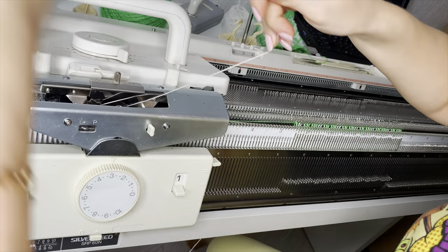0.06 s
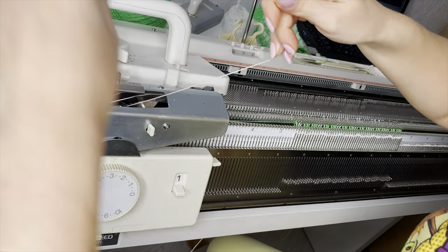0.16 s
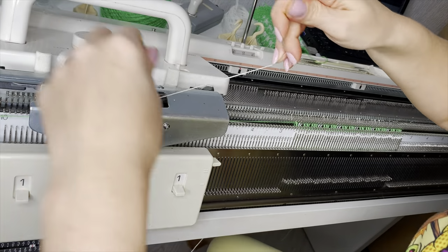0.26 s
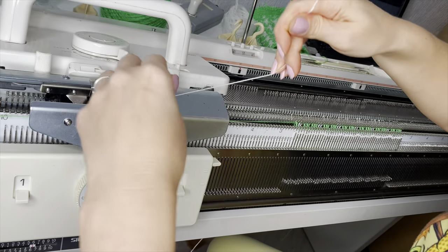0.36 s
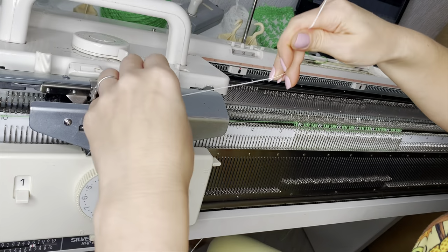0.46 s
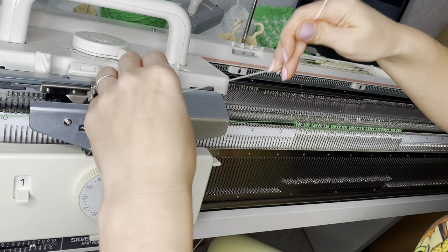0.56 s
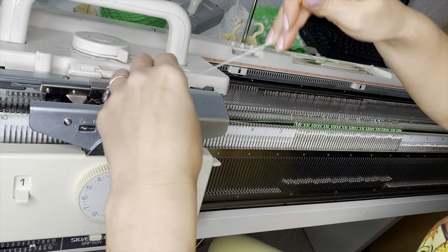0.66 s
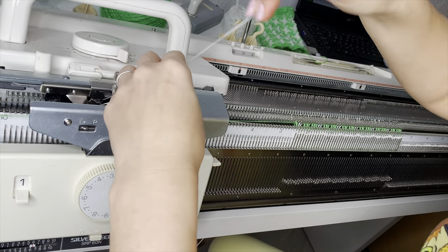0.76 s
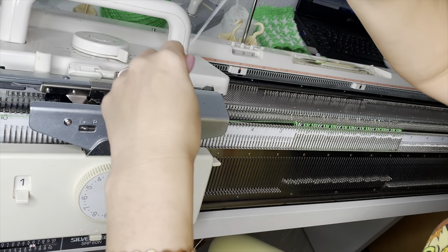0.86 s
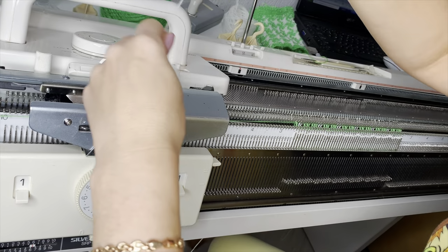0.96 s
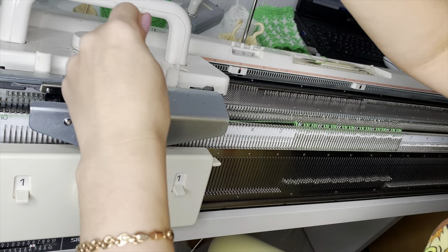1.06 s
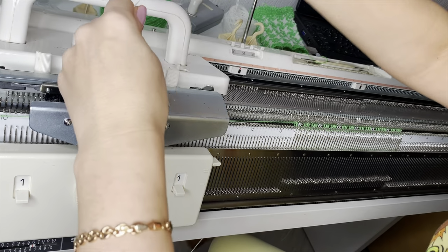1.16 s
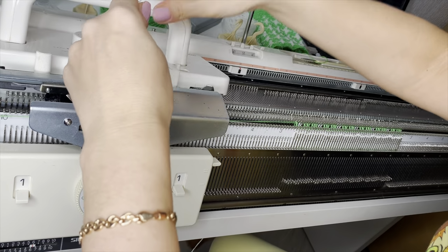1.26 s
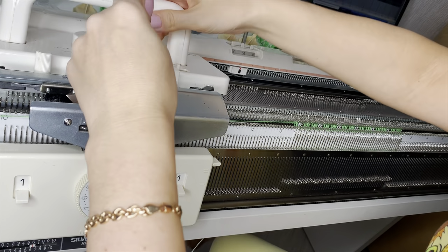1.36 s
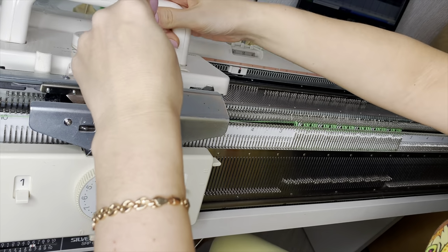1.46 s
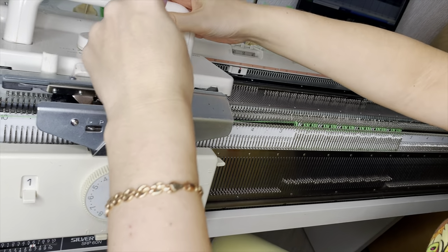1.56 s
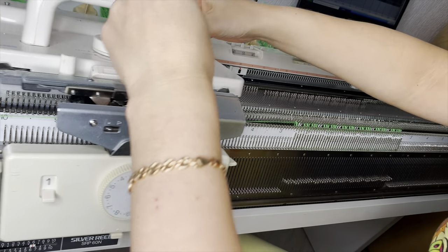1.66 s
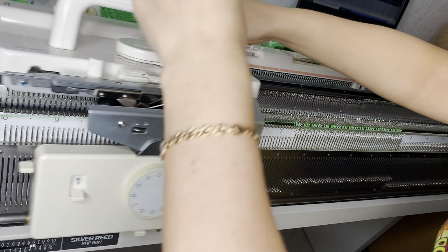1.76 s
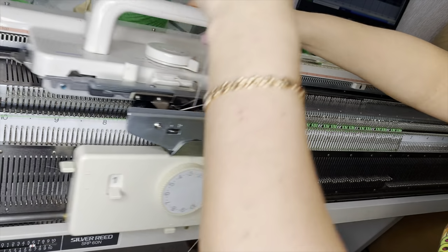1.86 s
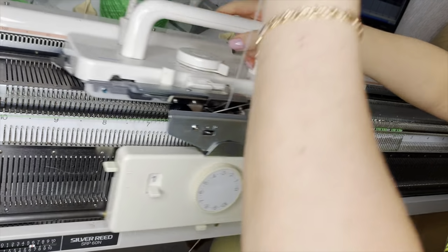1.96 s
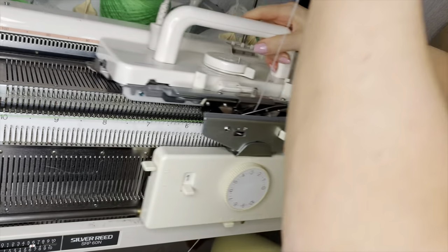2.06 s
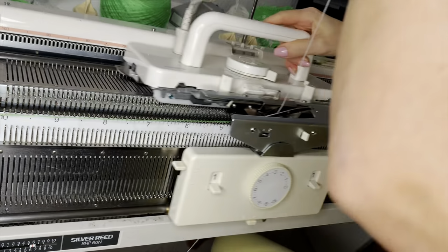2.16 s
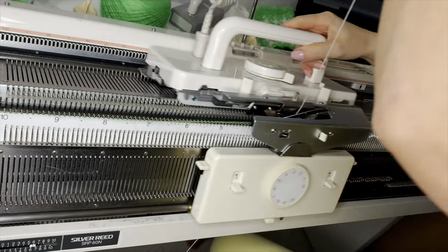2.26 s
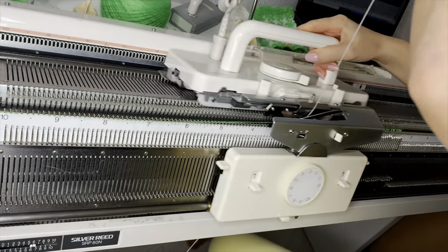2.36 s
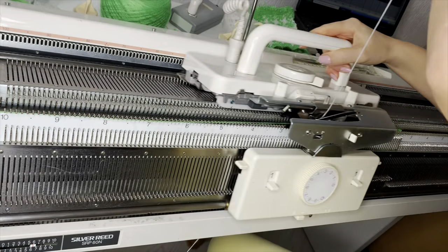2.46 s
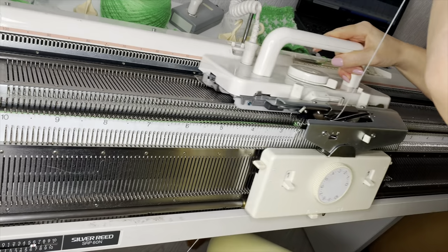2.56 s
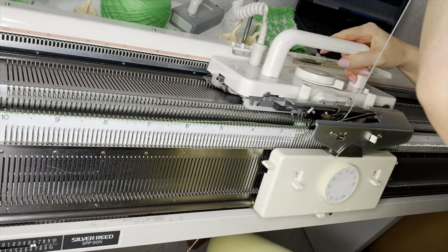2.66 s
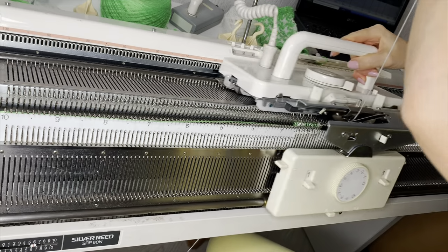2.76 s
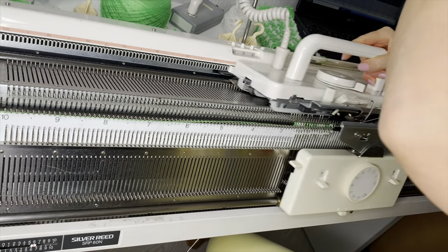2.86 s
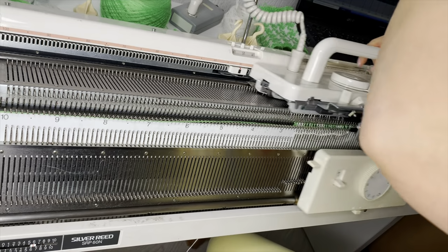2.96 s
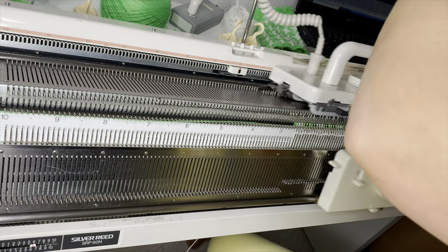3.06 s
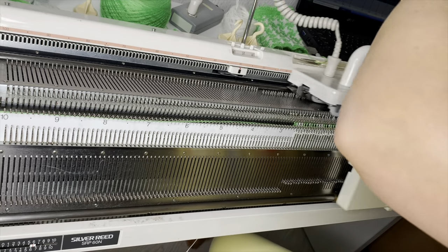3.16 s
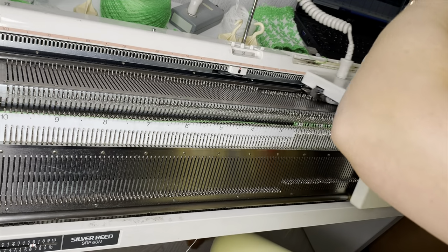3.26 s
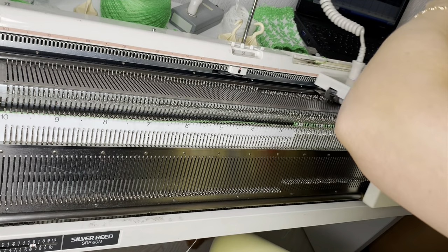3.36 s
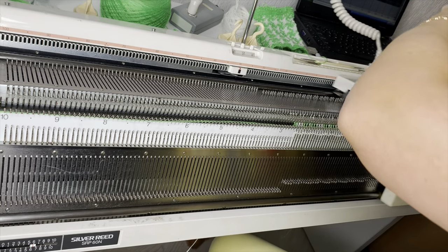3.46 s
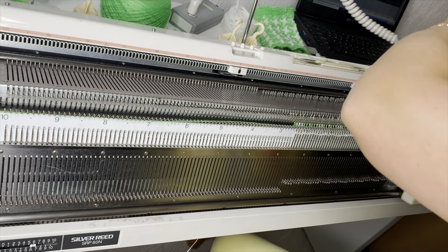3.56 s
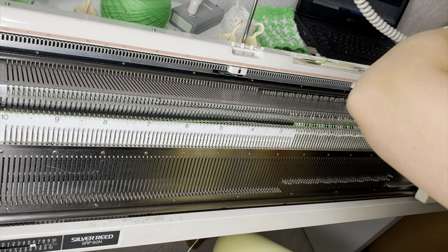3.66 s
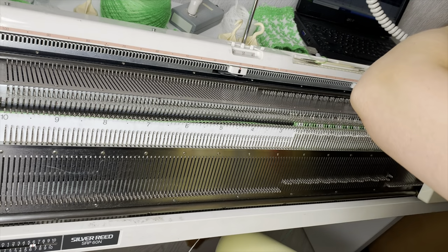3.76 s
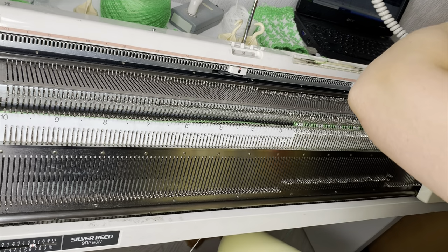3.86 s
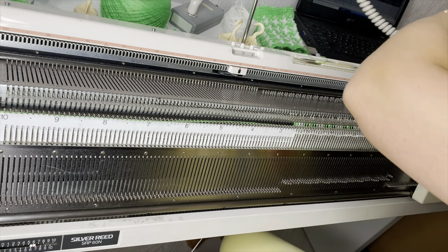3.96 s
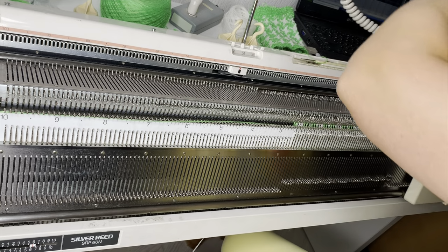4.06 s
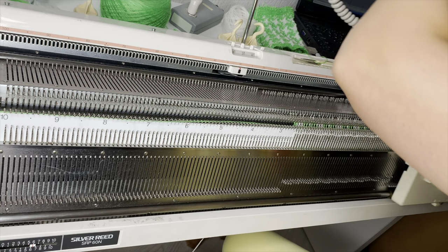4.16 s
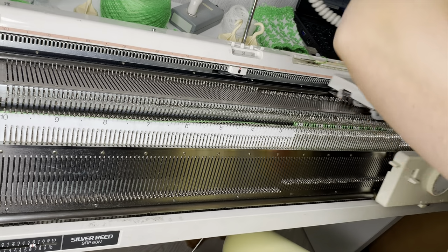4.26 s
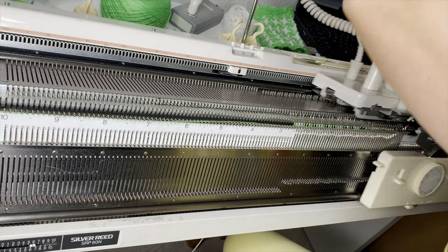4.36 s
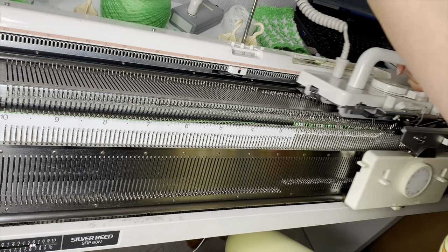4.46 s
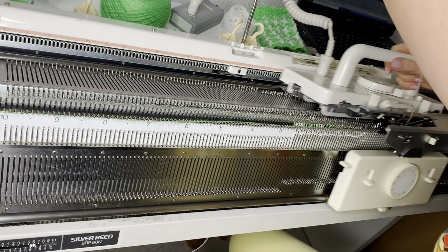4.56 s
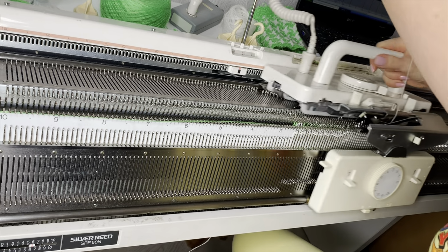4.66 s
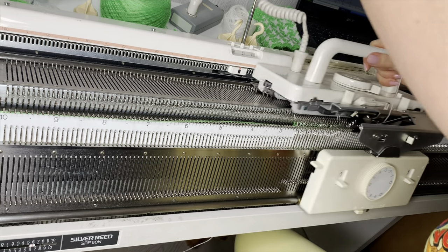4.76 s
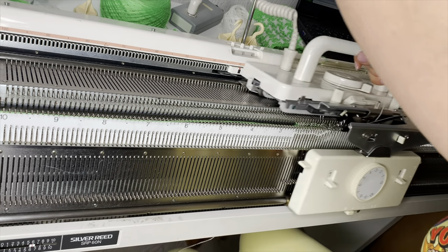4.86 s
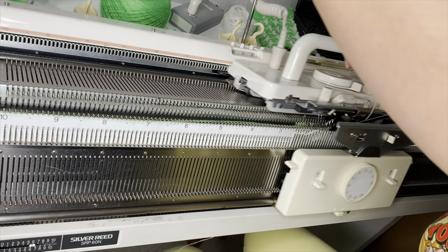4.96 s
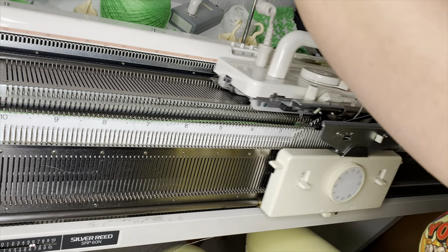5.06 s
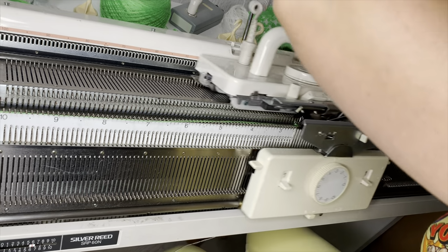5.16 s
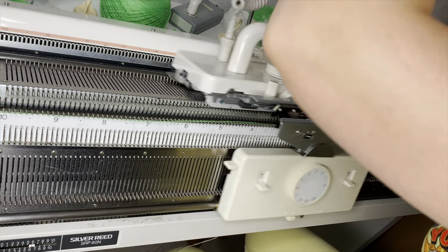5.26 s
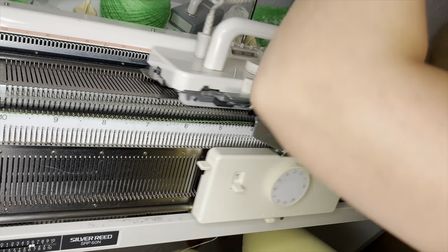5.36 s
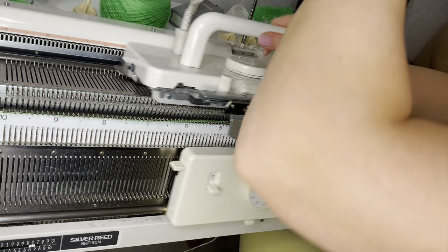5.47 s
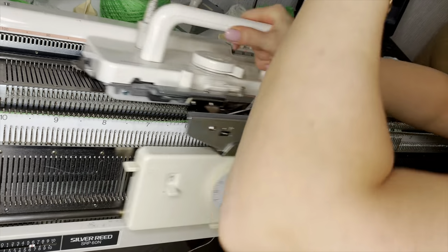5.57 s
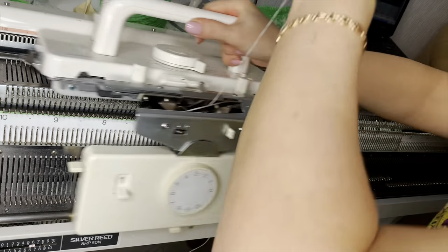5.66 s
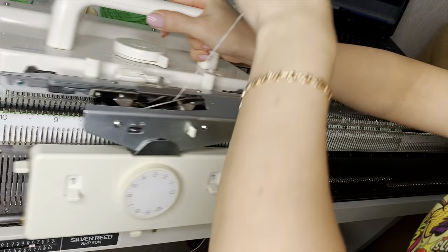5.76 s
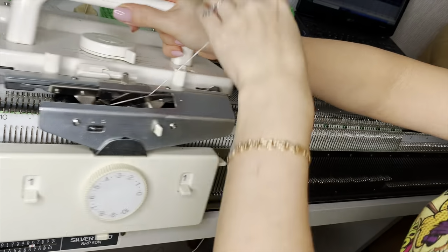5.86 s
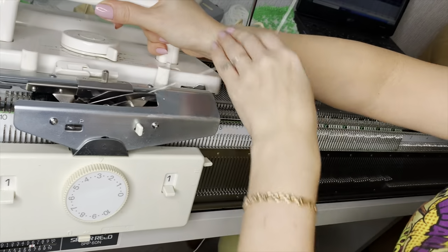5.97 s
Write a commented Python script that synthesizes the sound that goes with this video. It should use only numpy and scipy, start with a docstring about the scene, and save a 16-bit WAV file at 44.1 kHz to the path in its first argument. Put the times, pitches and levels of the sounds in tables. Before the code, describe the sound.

After faint hand taps, a knitting machine carriage rattles loudly across metal needles, snaps, pauses briefly, then clatters back and ends with a snap.

```python
"""A hand brushes, taps and bumps a knitting machine, then pushes its carriage along the needle beds and back.
Needles rattle through the cams and steel slides on steel: noise shaped by each needle's touches.
The table rumbles with the speed; sprung cam flaps click as noise bursts with ringing partials,
the carriage judders in swelling runs of slips, and the cams snap into and out of the row of needles.
A small room, heard from close by through two microphone ports."""
import sys
import numpy as np
from scipy import signal
from scipy.fft import rfft, irfft, next_fast_len
from scipy.io import wavfile
from scipy.ndimage import uniform_filter1d

SR = 44100
rng = np.random.default_rng(int(sys.argv[2]) if len(sys.argv) > 2 else 0)


def generate_wav(sig):
    """Save sig (samples, or channels by samples) to the path in sys.argv[1] as 16-bit PCM at SR."""
    pcm = np.round(np.clip(np.atleast_2d(sig).T, -1, 1) * 32767).astype(np.int16)
    wavfile.write(sys.argv[1], SR, pcm)


N = 264715
T = np.arange(N) / SR   # time in seconds

# The carriage's speed, out and back. Each row: time in seconds, needles passed per second.
CARRIAGE_SPEED = [(1.5, 24), (1.78, 21.2), (2.08, 48.6), (2.72, 47.4), (2.94, 57.8), (3.14, 65.5),
                  (3.33, 51.4), (3.68, 36.3), (3.8, 23.2), (3.92, 20.3), (4.1, 26.5), (4.18, 44),
                  (4.65, 52.5), (4.78, 44.8), (5.12, 51.5), (5.33, 61), (5.64, 42.8), (6.0, 31.6)]
PUSH_S = CARRIAGE_SPEED[0][0]   # the push begins
# Cam flaps and levers clicking. Each row: start in seconds, crack level in dB, casing knock and
# spring ring in dB relative to the crack, chatter in seconds, pitch the knock favours in Hz, flap pitch in Hz.
FLAP_CLICKS = [(0.036, -78.5, -6, 28.5, 0.044, 3500, 7900), (0.434, -61, 2.5, 6, 0.0058, 4530, 7740),
               (0.703, -70, -1, 2, .003, 4450, 7900), (1.3227, -27.5, -20, -16.5, 0.00048, 3690, 8720),
               (1.4917, -62, 0, -16, .0043, 1610, 8600), (1.563, -45, -7, -12, .009, 5500, 8400),
               (1.607, -42, 7, -22, 0.0029, 3870, 7640), (1.608, -51, 12.5, -20, 0.0036, 1440, 8700),
               (1.907, -40, -2, -22, 0.0031, 2270, 8900), (2.046, -29, -13, -15, .005, 2290, 8700),
               (2.0927, -12.5, -16, -1.5, 0.0032, 3220, 7800), (2.157, -19, -11, -20, 0.0062, 3300, 8800),
               (2.2, -14.5, -8.5, -8.5, 0.004, 2310, 9400), (2.279, -26, -2.5, -15, 0.0045, 3270, 8900),
               (2.3132, -34, -5, -15, .003, 2250, 8800), (2.3306, -13.5, -7, -8, 0.0022, 2300, 8800),
               (2.4282, -13.5, -11, -10, 0.0043, 1560, 9000), (2.47, -14, -6, -10, .0025, 4140, 9400),
               (2.552, -24, -5.5, -19, 0.0079, 2180, 8700), (2.638, -11.5, -10, -7, 0.0039, 2350, 8840),
               (2.7439, -25, -9, -20, 0.0031, 2350, 8800), (2.761, -18, -8.5, -25, .006, 3620, 8870),
               (2.8233, -12, -11, -18, .002, 2290, 7500), (2.8951, -18.5, -12, -17, 0.013, 2340, 8820),
               (2.949, -13, -12.5, -7, .003, 2400, 8000), (3.051, -26, -14, -18, .002, 3250, 8900),
               (3.218, -32, -19, -18, .004, 2300, 8800), (3.348, -24.5, -8, -21, 0.0044, 2440, 8800),
               (3.4214, -31, -4, -20, .002, 2400, 8800), (3.4428, -24.5, -6, -18, .003, 2350, 8800),
               (3.465, -15.5, -11.5, -19, .004, 2350, 8760), (3.512, -29, -13, -20, 0.013, 2360, 8700),
               (4.118, -39, -15, -19, .005, 2300, 8800), (4.3404, -30, -19, -18, .002, 3400, 9000),
               (4.3734, -10.5, -14.5, -16, 0.0031, 3400, 9160), (4.477, -8.5, -19, -14, 0.0036, 2312, 9200),
               (4.5778, -11, -18, -10, .0027, 4368, 9730), (4.6695, -11.5, -23, -25, .0051, 2340, 9150),
               (4.8041, -23, -13, -18, .002, 2400, 8976), (4.8461, -20, -23, -20, .0008, 3400, 9040),
               (4.8645, -7.5, -19.5, -31, 0.0037, 3690, 8300), (4.958, -18, -19, -18, .003, 2480, 8950),
               (4.973, -15.5, -14, -21, 0.0018, 2490, 8970), (5.0157, -12, -16.5, -15, 0.0028, 3711, 8176),
               (5.075, -28, -15, -18, .002, 2400, 9100), (5.5324, -20.5, -9.5, -19, .003, 2319, 8810),
               (5.5622, -12, -10.5, -10.5, 0.0022, 1743, 8750)]
CLICK_RISE_S = .001
# spread of the grip of rubbing skin and yarn in dB, 0 for smooth; steps per second
GRIP_STEPS_PER_S, GRIP_SPREAD_DB = 100, 0


def from_db(db):
    """Decibels to gain."""
    return 10 ** (np.asarray(db) / 20)


def rms_one(x):
    """Scale to unit power."""
    return x / np.sqrt(np.mean(x ** 2) + 1e-20)


def even_out(x, window):
    """Divide out the slow swells of the level, keeping the quick detail."""
    return x / np.sqrt(uniform_filter1d(x[0] ** 2, window) + 1e-6)


def at_hz(points, hz):
    """Read a table along log frequency."""
    f, value = np.transpose(points)
    return np.interp(np.log(np.maximum(hz, 1)), np.log(f), value)


def noise():
    """Two unrelated white noises: what the ports share, and what differs between them."""
    return rng.standard_normal((2, N))


def colour(x, spectrum, size=4096):
    """Causal (minimum-phase) filter with the given spectrum; white noise keeps its power."""
    log_gain = np.log(from_db(at_hz(spectrum, np.fft.rfftfreq(size, 1 / SR))))
    # folding the cepstrum onto positive times makes the filter minimum-phase
    cepstrum = irfft(log_gain)
    cepstrum[1:size // 2] *= 2
    cepstrum[size // 2 + 1:] = 0
    response = irfft(np.exp(rfft(cepstrum)))
    return signal.oaconvolve(x, response[None] / np.linalg.norm(response), axes=1)[:, :N]


def resonate(x, modes):
    """Parallel resonances of alternating sign; white noise keeps its power."""
    out, power = 0, 0
    for k, (hz, width, db) in enumerate(modes):
        r = np.exp(-np.pi * width / SR)
        zeros = np.array([1, 0, -1]) * (1 - r * r) / 2
        poles = [1, -2 * r * np.cos(2 * np.pi * hz / SR), r * r]
        out = out + (-1) ** k * from_db(db) * signal.lfilter(zeros, poles, x + 1e-18)
        power += from_db(db) ** 2 * (1 - r)
    return out / np.sqrt(power)


def blow(rise_s, hold_s, t60):
    """Envelope of one contact: it builds, chatters for a moment and dies."""
    t = T[:SR // 2]
    return np.minimum(t / rise_s, 1) * from_db(-60 * np.maximum(t - hold_s, 0) / t60)


def ring(hz, rise_s, t60):
    """One dying tone, a quarter cycle apart in the two rows so that both ports hear it."""
    t = T[:SR // 5]
    phase = rng.random() + np.array([[0], [rng.choice([-1, 1]) / 4]])
    return blow(rise_s, rise_s, t60)[:len(t)] * np.sin(2 * np.pi * (hz * t + phase))


def add(out, s, sound):
    """Mix a sound in at time s."""
    start = max(round(s * SR), 0)
    out[..., start:start + sound.shape[-1]] += sound[..., :N - start]


def hump(s, width_s):
    """A smooth rise and fall around time s, height 1."""
    return np.exp(-np.minimum(((T - s) / width_s) ** 2, 20))


def uneven(per_s, spread_db):
    """Randomly wandering gain of a contact; unit power, and constant when the spread is 0 dB."""
    grip = np.clip(rng.standard_normal(4096), -2, 2)
    return rms_one(from_db(spread_db * np.interp(T * per_s, np.arange(4096), grip)))


def air():
    """Steady background of the quiet room: noise with a coloured spectrum."""
    # Background spectrum. Each row: frequency in Hz, relative level in dB per Hz.
    air_spectrum = [(15, -52), (25, 17.5), (59, -6.5), (384, -14.5), (911, -23.5), (1610, -22), (6380, -47),
                    (7110, -39.5), (9320, -36.5), (10700, -37), (11600, -42.5), (14000, -39), (16000, -85)]
    return from_db(-62) * colour(noise(), air_spectrum)


def skin():
    """Skin resting on and stroking the casing: smooth noise, a dull rub and a bright swish."""
    # The hand brushes the casing. Each row: start in seconds, length in seconds,
    # dull rub in dB, bright swish in dB.
    brushes = [(0.006, 0.024, -50, -72), (0.065, 0.031, -58.5, -70), (0.12, .02, -55.5, -71),
               (0.158, 0.036, -59, -78), (0.241, 0.01, -60, -84), (0.303, 0.19, -78, -87),
               (0.671, .01, -65, -92), (0.774, 0.017, -57.5, -64.5), (0.969, 0.011, -65, -88),
               (1.506, 0.019, -53, -81)]
    # Dull rub spectrum. Each row: frequency in Hz, relative level in dB per Hz.
    rub_spectrum = [(60, 11.5), (150, 1.5), (330, -2), (550, -2), (900, -15), (2000, -25), (5000, -37)]
    # Bright swish spectrum. Each row: frequency in Hz, relative level in dB per Hz.
    swish_spectrum = [(600, -25), (1500, 4), (3000, 5), (5000, 2.5), (8000, 6.5), (12000, -38),
                      (16000, -16)]
    # the hand rests on the handle until the push begins
    rub, swish = from_db(-72.5) * (T < PUSH_S), np.zeros(N)
    for s, length_s, rub_db, swish_db in brushes:
        stroke = blow(rise_s=0.0025, hold_s=length_s, t60=0.19)
        add(rub, s, from_db(rub_db) * stroke)
        add(swish, s, from_db(swish_db) * stroke)
    out = from_db(2.0) * rub * colour(noise(), rub_spectrum) + swish * colour(noise(), swish_spectrum)
    return out * uneven(GRIP_STEPS_PER_S, GRIP_SPREAD_DB)


def bumps():
    """Soft thuds that glide down in pitch and rattle as they die: bending waves arrive highest first."""
    # Soft bumps on the machine. Each row: start in seconds, level in dB, first pitch in Hz,
    # pitch it settles towards in Hz.
    bump_rows = [(0.008, -54, 480, 262), (0.08, -50, 119, 68.6), (0.124, -49.5, 382, 298),
                 (0.168, -48, 364, 296), (0.77, -54, 367, 149), (1.493, -55, 700, 201),
                 (1.522, -43.5, 168, 73), (1.86, -53, 428, 380), (1.996, -43, 422, 338.1),
                 (2.36, -33.5, 230, 91.6), (2.962, -29.5, 103.1, 79), (3.206, -27, 111, 85.57),
                 (3.35, -32.5, 107, 82.5), (3.967, -44.5, 300, 99), (4.044, -50.5, 479.7, 400.2),
                 (4.676, -40, 149, 79), (5.86, -52, 379, 327)]
    thuds = np.zeros(N)
    for s, db, first_hz, last_hz in bump_rows:
        hz = last_hz + (first_hz - last_hz) * np.exp(-T[:SR // 2] / 0.0149)
        tone = np.sin(2 * np.pi * np.cumsum(hz) / SR)
        add(thuds, s, from_db(db) * blow(0.0019, 0.016, 0.15) * tone)
    return thuds * uneven(per_s=220, spread_db=4)


def hands():
    """Skin rubs and swishes in both noises; the bumps go only into the sound the ports share."""
    out = skin()
    out[0] += bumps()
    return out


def yarn():
    """Yarn scrapes steadily through its wire guide: noise through the guide's resonances."""
    # Pulls of the yarn. Each row: start in seconds, swell in seconds, level in dB.
    yarn_pulls = [(0.003, 0.0027, -67), (0.13, .015, -73), (0.18, .035, -64.5)]
    # Resonances of the guide. Each row: frequency in Hz, width in Hz, level in dB.
    guide_modes = [(3400, 740, -1), (2700, 430, 0)]
    pull = np.zeros(N)
    for s, swell_s, db in yarn_pulls:
        add(pull, s, from_db(db) * blow(swell_s, swell_s, 0.15))
    return resonate(pull * uneven(GRIP_STEPS_PER_S, GRIP_SPREAD_DB) * noise(), guide_modes)


def knock(chatter_s, favoured_hz):
    """The casing is knocked; the spot struck decides which resonances rattle most and which tone rings on."""
    # Resonances of the casing. Each row: frequency in Hz, width in Hz,
    # level in dB before the favouring below.
    casing_modes = [(1520, 63, 6.5), (1766, 41, 8), (2320, 320, 4.5), (2800, 102, 6.5), (3270, 490, 1),
                    (3620, 70, 9.5), (4070, 910, 5.5), (4390, 170, 4.5)]
    db_per_octave = 6   # lost for each octave away from the favoured pitch
    favoured_modes = []
    for hz, width, db in casing_modes:
        octaves_away = abs(np.log2(hz / favoured_hz))
        favoured_modes.append((hz, width, db - db_per_octave * octaves_away))
    envelope = blow(CLICK_RISE_S, chatter_s, 0.024)[:SR // 5]
    rattle = resonate(envelope * rng.standard_normal((2, SR // 5)), favoured_modes)
    return from_db(-2) * rattle + from_db(-3) * ring(favoured_hz, CLICK_RISE_S, 0.036)


def clicks():
    """A sprung flap chatters for milliseconds, knocks the casing and rings with its spring; nails tap too."""
    # Fingernails tap the casing. Each row: start in seconds, level in dB, pitch the knock favours in Hz.
    nail_taps = [(0.128, -63, 1600), (0.155, -66, 3600), (0.39, -68, 4500), (0.435, -57, 1560),
                 (0.704, -70, 1550), (0.961, -66, 1520), (1.465, -57, 3600), (1.466, -60, 1800)]
    # Close partials of a flap. Each row: ratio to its pitch, level in dB relative to the crack.
    flap_modes = [(.955, -19), (1, -11.5), (1.05, -12.5)]
    # The flap spring. Each row: frequency in Hz, level in dB, t60 in seconds.
    spring_modes = [(1524, -19, 0.039), (4490, -21, .1), (7840, -1, 0.051)]
    # Crack spectrum. Each row: frequency in Hz, relative level in dB per Hz.
    crack_spectrum = [(500, -18.5), (2000, -10.5), (5500, -9.5), (8000, 4.5), (10000, 1.5), (12500, 0),
                      (15500, -19)]
    force, out = np.zeros(N), np.zeros((2, N))
    for s, db, knock_db, spring_db, chatter_s, favoured_hz, flap_hz in FLAP_CLICKS:
        add(force, s, from_db(db) * blow(CLICK_RISE_S, chatter_s, 0.017))
        add(out, s, from_db(db + knock_db) * knock(chatter_s, favoured_hz))
        for ratio, mode_db in flap_modes:
            add(out, s, from_db(db + mode_db) * ring(ratio * flap_hz, CLICK_RISE_S, t60=0.019))
        for hz, mode_db, t60 in spring_modes:
            add(out, s, from_db(db + spring_db + mode_db) * ring(hz, chatter_s / 2, t60))
    for s, db, favoured_hz in nail_taps:
        add(out, s, from_db(db) * knock(0.0024, favoured_hz))
    return out + from_db(-11.5) * colour(force * noise(), crack_spectrum)


def judders():
    """The carriage drags on its rail in a swelling run of slips: its plates rattle, then its shell booms."""
    # The carriage jerks into motion or judders. Each row: start in seconds, rattle in dB, boom in dB,
    # swell in seconds, hold in seconds.
    judder_rows = [(1.483, -51, -45.5, 0.0074, .007), (2.413, -24, -23.5, 0.012, 0.022),
                   (5.396, -26, -23.5, 0.01, 0.025)]
    # Rattling steel plates. Each row: frequency in Hz, width in Hz, level in dB.
    plate_modes = [(1050, 130, -2), (1497, 110, 3), (1615, 160, 2.5), (2420, 500, -3), (3340, 530, -4),
                   (4400, 720, -6.5), (8300, 4500, -10.5)]
    # The booming shell. Each row: frequency in Hz, width in Hz, level in dB.
    shell_modes = [(325, 24, 8.5), (390, 22, 2.5), (510, 180, -0.5), (662, 147, 1.5), (777, 170, -0.5)]
    boom_lag_s = 0.0056   # the boom builds later than the rattle
    rattle, boom = np.zeros(N), np.zeros(N)
    for s, rattle_db, boom_db, swell_s, hold_s in judder_rows:
        add(rattle, s, from_db(rattle_db) * blow(swell_s, hold_s, 0.068))
        add(boom, s + boom_lag_s, from_db(boom_db) * blow(swell_s, hold_s, 0.15))
    slips = noise() * uneven(per_s=450, spread_db=4.5)
    plates = from_db(1.5) * resonate(rattle * slips, plate_modes)
    shell = from_db(1.0) * resonate(boom * slips, shell_modes)
    return plates + shell


def speed():
    """Needles passed per second."""
    return np.maximum(np.interp(T, *np.transpose(CARRIAGE_SPEED)), 1)


def by_speed(law):
    """Gain of a layer that grows with the speed of the carriage; silent until it moves."""
    cruise_db, db_per_doubling, lag_s = law
    cruise_per_s = 50   # needles per second
    gain = (T > PUSH_S) * from_db(cruise_db + db_per_doubling * np.log2(speed() / cruise_per_s))
    return np.interp(T - lag_s, T, gain)


def load_curve(rows):
    """Gain in time from rows of seconds and dB; silent away from the rows."""
    s, db = np.transpose(rows)
    inside = np.interp(T, [s[0] - .005, s[0], s[-1], s[-1] + .012], [0, 1, 1, 0])
    return inside * from_db(np.interp(T, s, db))


def cam_load():
    """Pressure of the cams on the needles, swelling slightly around each flap click."""
    # The leading cam grazes the first needles. Each row: time in seconds, load in dB.
    load_graze = [(1.7, -31), (1.79, -12.5), (1.84, -17.5), (1.895, -24)]
    # How hard the cams bear going out. Each row: time in seconds, load in dB.
    load_out = [(1.908, -3), (2.02, -6.5), (2.06, -2), (2.56, -0.5), (2.63, -7.5), (2.77, -2.5), (3.1, 0),
                (3.38, -7.5), (3.46, -4.5), (3.5, -10.5), (3.58, -12), (3.67, -12), (3.76, -26)]
    # How hard they bear coming back. Each row: time in seconds, load in dB.
    load_back = [(4.125, -6.5), (4.16, -1.5), (4.28, 1.5), (4.42, -0.5), (4.66, 4), (4.72, -8), (4.8, -1),
                 (4.92, -5), (4.98, -1), (5.26, 0), (5.54, -4.5), (5.68, -10), (5.8, -14.5)]
    swell_db, lead_s, width_s = 1.5, 0.0023, 0.029
    swell = sum(hump(s - lead_s, width_s) for s, *_ in FLAP_CLICKS)
    load = load_curve(load_graze) + load_curve(load_out) + load_curve(load_back)
    return load * from_db(swell_db * swell)


def needle_contacts(count, jitter_s, spread_db, t60, sliding):
    """Every needle meets several cam faces in turn; each touch is a brief rasp above steady sliding."""
    travel = np.cumsum(speed()) / SR   # needles passed so far
    touches = np.zeros(N)
    for face in rng.random(count):
        s = np.interp(np.arange(int(travel[-1]) - 1) + face, travel, T)
        late, force = np.clip(rng.standard_normal((512, 2))[:len(s)].T, -2, 2)
        index = np.clip((s + jitter_s * late) * SR, 0, N - 1).astype(int)
        touches[index] += from_db(spread_db * force) ** 2
    # this is power, so its decay in dB is doubled
    power = signal.lfilter([1], [1, -from_db(-120 / (t60 * SR))], touches + 1e-18)
    power /= uniform_filter1d(power, SR // 12) + 1e-6
    return noise() * np.sqrt((power + sliding) / (1 + sliding))


def pings(count, spread_db):
    """Each passing needle flicks several small steel parts, each ringing briefly at its own pitch."""
    travel = np.cumsum(speed()) / SR
    out = np.zeros((2, N))
    for k, (late, pitch, force, *phases) in enumerate(rng.random((int(travel[-1]) * count, 5))):
        hz = 800 * 16 ** pitch
        t60 = .036 * (2000 / hz) ** .7   # higher parts ring more briefly
        t = T[:int(t60 * SR)]
        envelope = from_db(spread_db * force - 60 * t / t60)
        tone = envelope * np.sin(2 * np.pi * (hz * t + np.array(phases)[:, None]))
        s = np.searchsorted(travel, (k + late) / count) / SR
        add(out, s, np.sqrt(hz / t60) * tone)   # even power per Hz
    return even_out(out, SR // 4)


def ticks():
    """Latches flick shut at uneven gaps, more often at speed, with slightly varying force."""
    ticks_per_needle, tick_db, spread_db, t60 = 1.6, 3.5, 1, 0.0035
    shut = rng.random(N) < ticks_per_needle * speed() / SR
    force = shut * from_db(tick_db + spread_db * np.minimum(rng.exponential(1, N), 3))
    return noise() * signal.lfilter([1], [1, -from_db(-60 / (t60 * SR))], force + 1e-18)


def carriage():
    """Needle contacts shake the table, the bed and the needles themselves; the latches add a bright scrape."""
    # How each layer follows the carriage. Each law: level in dB at cruising speed,
    # dB gained per doubling of the speed, lag in seconds.
    rumble_law = (-41.5, 20.8, 0.054)
    drone_law = (-41.5, 19.4, 0)
    clatter_law = (-35, 9.4, 0)
    scrape_law = (-34.5, 4.7, 0)
    # The rumble drops out briefly. Each row: time in seconds, depth in dB.
    rumble_dips = [(2.69, 13), (4.8, 18), (4.1, 6), (5.2, 7)]
    # Resonances of the table, the bed, the needles with their bed plates, and the latches.
    # Each row: frequency in Hz, width in Hz, level in dB.
    table_modes = [(63, 17.4, -7), (85.3, 10.9, 0), (126.7, 10.4, -7.5), (143, 12, -6.5)]
    bed_modes = [(227, 17, -5.5), (322.4, 26, 4.5), (387.5, 18, -0.5), (511.4, 44, 5.5), (616, 44, -6),
                 (716, 250, -8)]
    steel_modes = [(914, 360, 4.5), (1357, 53, -27), (1387, 54, -17), (1986, 87, 4), (2266, 63, 5.5),
                   (2616, 36, 4.5), (2970, 58, -27), (3230, 19, 1.5), (3995, 540, -3.5)]
    latch_modes = [(8000, 260, 22.5), (8620, 170, 22), (9380, 480, 1), (10340, 140, -25.5),
                   (12300, 250, -22.5)]
    # Spectra of drone, clatter and scrape. Each row: frequency in Hz, relative level in dB per Hz.
    drone_spectrum = [(130, -16), (200, -7.5), (330, -7.5), (600, 2), (800, -7), (1200, -10), (2500, -39.5)]
    clatter_spectrum = [(400, -32.5), (800, 1), (1200, 2), (1700, 2), (2300, 3.5), (3000, 1), (4000, -1),
                        (5200, -7), (6500, -4.5), (9000, -20.5), (16000, -74)]
    scrape_spectrum = [(2500, -18), (5000, -3), (6800, -2), (7900, 1.5), (9500, 2.5), (11500, -1.5),
                       (13000, -1.5), (15500, -8.5)]

    load = cam_load()
    drone_gain = by_speed(drone_law)
    dips_db = sum(db * hump(s, width_s=0.032) for s, db in rumble_dips)
    rumble_gain = by_speed(rumble_law) * from_db(-dips_db)
    # loose needles still rattle a little without load; the latches answer the load more steeply
    clatter_gain = by_speed(clatter_law) * (load + from_db(-19))
    scrape_gain = by_speed(scrape_law) * (load ** 1.48 + from_db(-40))

    butts = needle_contacts(count=4, jitter_s=.002, spread_db=3.5, t60=.02, sliding=.4)
    hooks = needle_contacts(count=2, jitter_s=.003, spread_db=1.5, t60=0.015, sliding=0.15)
    latches = needle_contacts(count=5, jitter_s=.003, spread_db=4.0, t60=.018, sliding=.5)
    tinkle = pings(count=16, spread_db=9)
    ticking = ticks()

    table = even_out(resonate(butts, table_modes), SR // 14)
    bed = resonate(butts, bed_modes) + from_db(-0.5) * colour(butts, drone_spectrum)
    # needle and latch noise is part rasp, part ringing, part ticks
    needle_force = .76 * butts + .48 * tinkle + .95 * ticking
    latch_force = .84 * latches + .27 * tinkle + 1.35 * ticking
    needles = from_db(-2.5) * colour(needle_force, clatter_spectrum)
    needles += from_db(-8.5) * resonate(hooks, steel_modes)
    scrape = from_db(-1.5) * colour(latch_force, scrape_spectrum)
    scrape += from_db(-13.0) * resonate(hooks, latch_modes)
    rattle = drone_gain * bed + clatter_gain * needles + scrape_gain * scrape
    return rumble_gain * table, rattle


def snaps():
    """A hard broad crack and its rebound; the blow sets the frame ringing and the needles shivering."""
    # The cams snap into or out of the row of needles. Each row: start in seconds, peak in dB,
    # frame ringing and needle shiver in dB relative to the peak, chatter in seconds, end of the bed.
    snap_rows = [(1.607, -43.5, -8.5, -6, 0.0047, "left"), (3.5968, -18, -8.5, -15.5, 0.0028, "right"),
                 (3.944, -43.5, -18, -7, 0.0036, "right"), (5.695, -16, -11.5, -23, 0.0054, "left")]
    # The carriage frame. Each row: frequency in Hz, t60 in seconds,
    # level in dB when struck at the left end of the bed, level in dB at the right end.
    frame_modes = [(660, 0.14, -9, -7.5), (809, 0.092, -19, -4), (924, 0.12, -18, -10),
                   (1597, 0.027, -14.5, -27.5), (1760, 0.046, -1, -2), (2047, 0.042, 0, -6),
                   (2350, 0.054, -20, -5), (2613, 0.04, -19, 1.5), (2830, 0.049, -1, -5),
                   (3304.4, 0.07, -10, -27), (3680, 0.12, -15, -26), (3870, 0.034, -13, -24),
                   (4330, .035, -14, -5.5), (6255, 0.066, -4, -24.5), (6540, 0.031, -8, 2),
                   (8280, 0.02, 2, 11.5), (8320, 0.097, -15, -13), (8580, 0.024, 7, 5.5),
                   (9400, 0.043, 0, -17)]
    # Snap spectrum. Each row: frequency in Hz, relative level in dB per Hz.
    snap_spectrum = [(200, -3), (500, -0.5), (800, 2), (1100, -2), (1900, 4), (2700, 3.5), (4000, 0.5),
                     (5200, -4.5), (6600, 3), (7400, -0.5), (8500, -4.5), (11000, 0.5), (15500, -16)]
    rebound_s, rebound_db = 0.0117, -19
    rise_cycles = 12.6   # so the low modes take longer to build up
    crack, frame = np.zeros(N), np.zeros((2, N))
    for s, db, frame_db, shiver_db, chatter_s, end in snap_rows:
        strike = from_db(-5.5) * blow(CLICK_RISE_S, chatter_s, 0.014)
        shiver = from_db(shiver_db) * blow(0.0015, 0.0087, 0.13)
        add(crack, s, from_db(db) * (strike + shiver))
        add(crack, s + rebound_s, from_db(db + rebound_db) * strike)
        for hz, t60, left_db, right_db in frame_modes:
            mode_db = left_db if end == "left" else right_db
            add(frame, s, from_db(db + frame_db + mode_db) * ring(hz, rise_cycles / hz, t60))
    return colour(crack * noise(), snap_spectrum) + frame


def room(x, wet_db):
    """Reverberation: a dense noise tail in octave bands, each dying at its own rate, the top fastest."""
    # Decay of the room. Each row: frequency in Hz, t60 in seconds.
    room_t60 = [(100, 0.47), (500, 0.15), (1400, 0.24), (3700, 0.27), (9000, 0.24), (15000, 0.013)]
    t, tail = T[:SR // 2], 0
    for hz in 88 * 2. ** np.arange(8):
        band = signal.butter(2, [hz / np.sqrt(2), hz * np.sqrt(2)], "band", fs=SR, output="sos")
        band_noise = signal.sosfilt(band, rng.standard_normal((2, len(t))))
        tail = tail + band_noise * from_db(-60 * t / at_hz(room_t60, hz))
    tail = rms_one(tail * np.minimum(t / 0.0018, 1)) / np.sqrt(len(t))
    return x + from_db(wet_db) * signal.fftconvolve(x, tail, axes=1)[:, :N]


def ports(x):
    """Shared and differing sound reach two ports; the treble arrives at the left one slightly later."""
    # How alike the two ports sound. Each row: frequency in Hz, likeness from 0 to 1.
    likeness = [(100, 0.97), (250, 0.91), (500, 0.42), (1200, 0.16), (3000, 0.17), (5000, 0.22),
                (7000, 0.58), (9300, 1), (11800, 1), (15000, 0.9)]
    # Balance of the ports. Each row: frequency in Hz, left minus right in dB.
    tilt = [(80, -1.5), (150, 2), (260, -2.5), (500, -3), (1000, 1.5), (3500, -2), (8000, 0)]
    size = next_fast_len(N + SR // 10)
    hz = np.fft.rfftfreq(size, 1 / SR)
    shared, differing = rfft(x, size)
    alike = np.clip(at_hz(likeness, hz), 0, .995)
    mid = np.sqrt((1 + alike) / 2) * shared
    side = np.sqrt((1 - alike) / 2) * differing
    lag_s = .000214 * np.clip(hz / 3000, 0, 1) ** 2   # full lag from 3 kHz up
    lean = from_db(at_hz(tilt, hz) / 2)
    left = (mid + side) * np.exp(-2j * np.pi * hz * lag_s) * lean
    right = (mid - side) / lean
    return irfft(np.array([left, right]), size)[:, :N]


def scene():
    """The machine on its table, in a quiet room; the table's rumble and the air get no reverberation."""
    rumble, rattle = carriage()
    soft = room(hands() + yarn() + rattle, wet_db=-5.5)
    hard = room(clicks() + judders() + snaps(), wet_db=-8.5)
    return ports(air() + soft + hard + rumble)


def record(dry):
    """The microphone sheds the deepest bass; the top is cut."""
    bass_cut = signal.butter(3, 44, "high", fs=SR, output="sos")
    top_cut = signal.ellip(10, .2, 80, 15750, fs=SR, output="sos")
    return signal.sosfilt(top_cut, signal.sosfilt(bass_cut, dry))


dry = scene()
out = record(dry)
generate_wav(out)
```